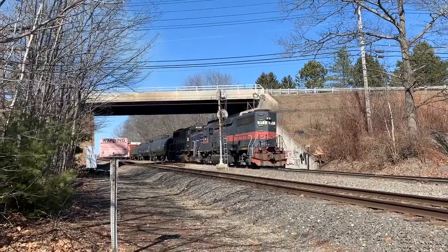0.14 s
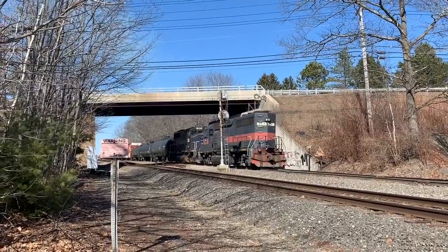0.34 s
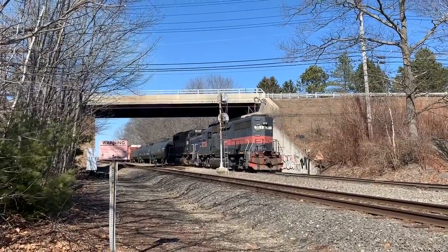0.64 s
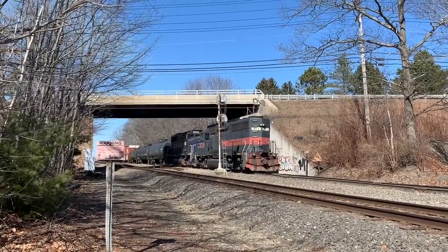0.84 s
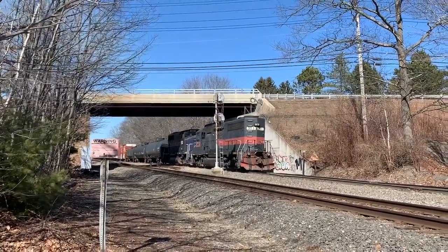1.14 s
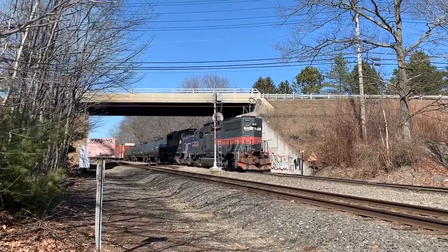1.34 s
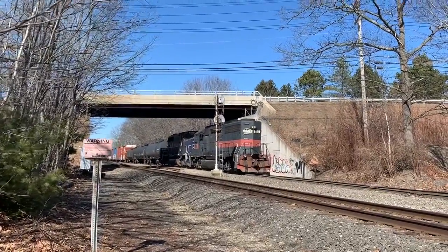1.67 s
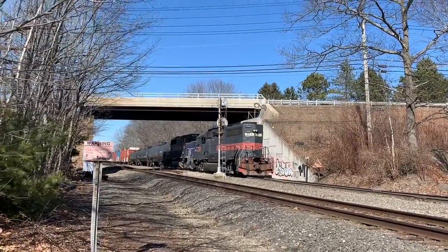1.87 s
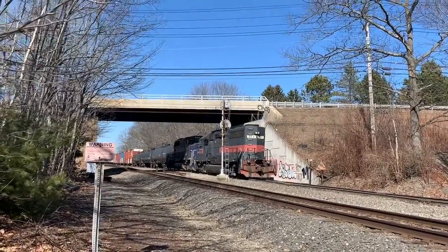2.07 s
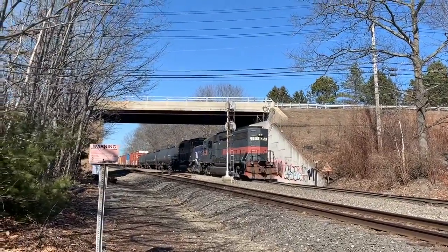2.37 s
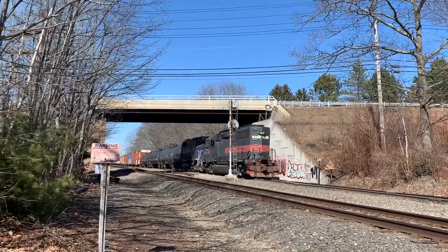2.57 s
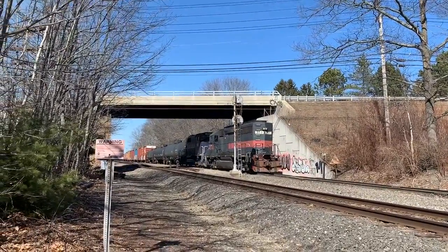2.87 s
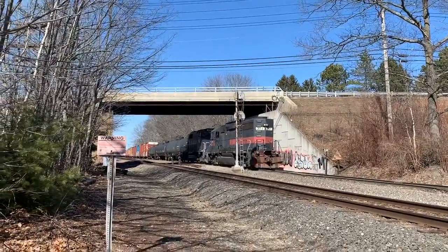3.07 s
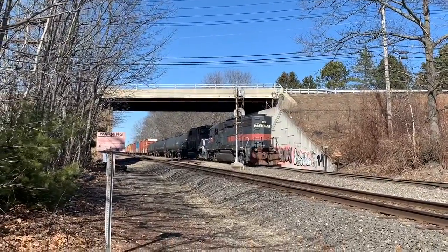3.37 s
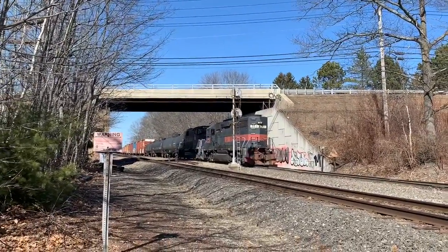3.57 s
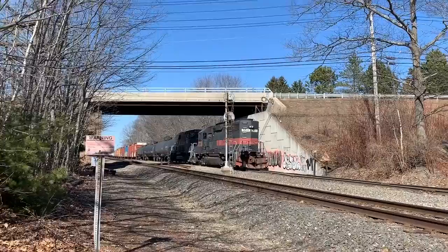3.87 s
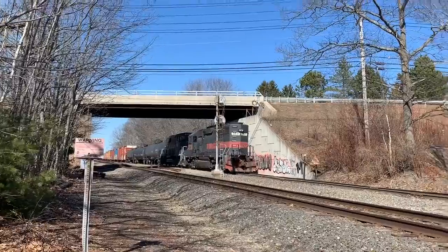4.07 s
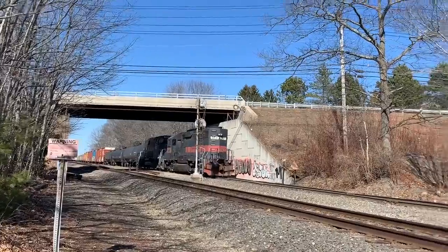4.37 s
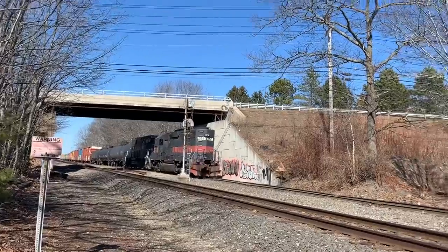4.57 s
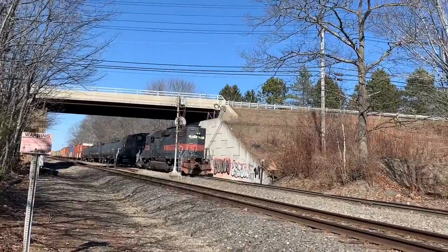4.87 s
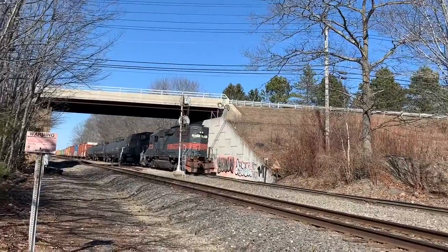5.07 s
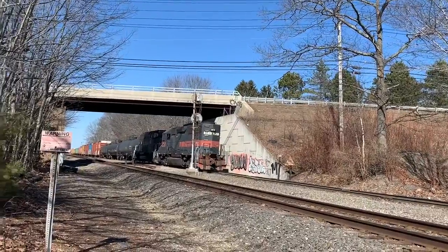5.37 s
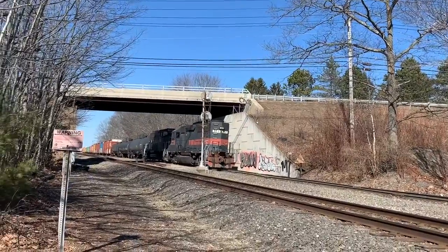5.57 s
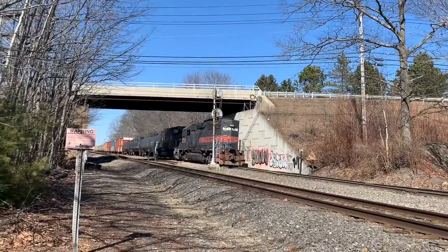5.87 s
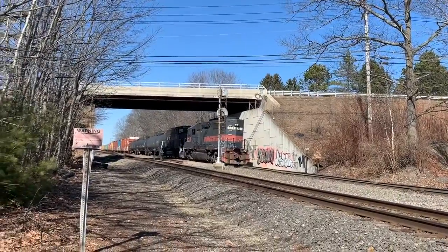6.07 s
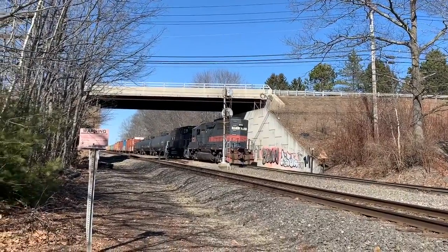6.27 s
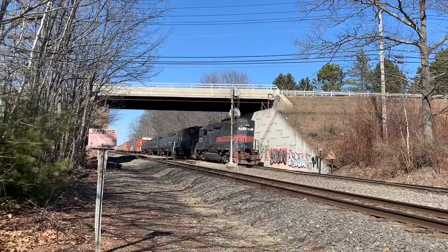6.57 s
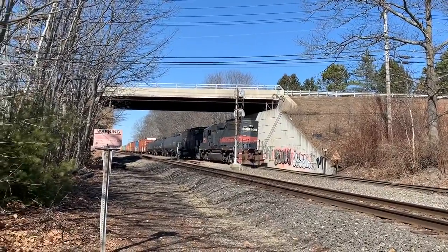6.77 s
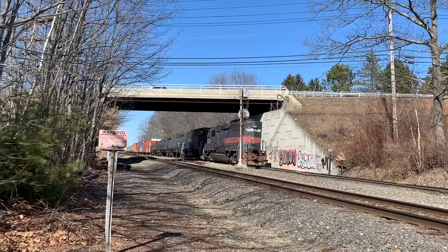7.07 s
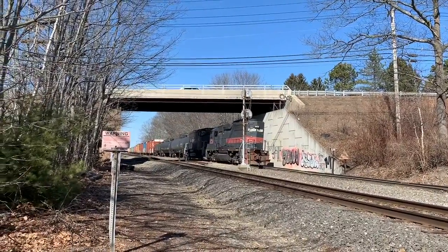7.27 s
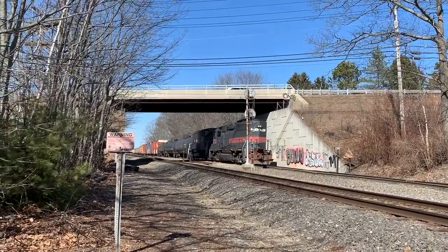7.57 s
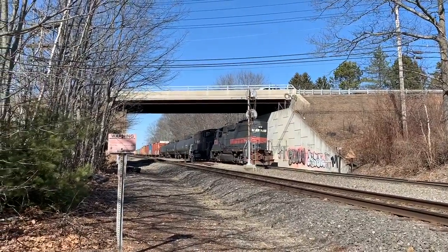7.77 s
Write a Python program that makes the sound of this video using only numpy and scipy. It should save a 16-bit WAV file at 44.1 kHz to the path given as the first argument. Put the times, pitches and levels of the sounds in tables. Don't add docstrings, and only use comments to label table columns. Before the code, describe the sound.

From 0 s two diesel locomotives fill the open air with a deep, beating throb, broad exhaust roar, gear whine and a high, breathy turbo whistle. All pitches slide steadily downward, the first engine settling by about 4 s and the second by 4.7 s, leaving a quieter, lumpy steady idle with fan rush to the end at nearly 8 s. A light knock comes at 1 s, a soft air sigh around 1.5 s, and a sharp air spit at 2.6 s. Hollow car bodies drum and flanges sing faintly, mostly early. The roar dips slightly near 4.1 s; a heavy coupler clunk cluster hits at 4.85 s. Short air spits follow at 5.0, 5.5 (brightest), 5.9 and 7.5 s, with a small knock at 6.9 s. Low wind buffets the handheld stereo microphone, strongest around 5, 6.5 and 7.3 s.

```python
import sys
import numpy as np
from scipy import signal
from scipy.fft import rfft, irfft, next_fast_len
from scipy.io import wavfile
from scipy.ndimage import map_coordinates

SR = 44100
rng = np.random.default_rng(int(sys.argv[2]) if len(sys.argv) > 2 else 0)


def file_out(sig):
    cols = np.atleast_2d(sig).T
    lim = np.clip(cols, -1, 1)
    pcm = np.round(lim * 32767).astype(np.int16)
    wavfile.write(sys.argv[1], SR, pcm)


def nominal_scale(level):
    x = np.asarray(level, float) / 20
    return 10 ** x


N = 349713


def locomotives():
    # time_s, first_rev_per_s, second_rev_per_s
    crank_speeds = [(0.0, 8.141, 8.816), (0.5, 7.704, 8.478), (1.0, 7.283, 8.055), (1.5, 6.849, 7.69),
                    (2.0, 6.437, 7.226), (2.25, 6.231, 7.157), (2.75, 5.839, 6.825), (3.25, 5.473, 6.375),
                    (3.5, 5.32, 6.223), (3.75, 5.223, 6.083), (4.0, 5.182, 5.909), (4.25, 5.172, 5.77),
                    (4.5, 5.173, 5.682), (4.75, 5.182, 5.655), (5.5, 5.213, 5.698), (6.1, 5.221, 5.704),
                    (7.0, 5.2, 5.701), (7.93, 5.195, 5.681)]
    # time_s, first_db, second_db
    whine_levels = [(0.0, -43, -48.5), (0.75, -48.5, -53.5), (1.5, -48.5, -57), (2.5, -50.5, -57),
                    (2.8, -51.5, -59), (3.15, -54, -60.5), (3.5, -50, -54.5), (3.75, -56, -58),
                    (4.05, -49, -55), (4.3, -51, -58), (4.55, -51, -55.5), (5.0, -53.5, -52.5),
                    (5.5, -52, -58.5), (5.9, -59, -57.5), (6.1, -51.5, -53), (6.5, -57.5, -55),
                    (6.9, -54.5, -58), (7.25, -50.5, -53), (7.93, -57.5, -56)]
    rev_1, rev_2 = curves(crank_speeds)
    whine_1, whine_2 = curves(whine_levels)
    firing_1, firing_2 = firing(rev_1, rev_2)
    first, crank_1 = engine(rev_1, .03, firing_1, whine_1, trim_db=-4)
    second, crank_2 = engine(rev_2, -.45, firing_2, whine_2, trim_db=0)
    return first + second + roar(rev_1, rev_2, crank_1, crank_2)


def firing(rev_1, rev_2):
    # time_s, level_db
    throb = [(0, -12.5), (.66, -14.5), (1.32, -19), (1.98, -24.5), (2.31, -20.5), (2.64, -22), (3.3, -26),
             (4.45, -40), (4.95, -28.5), (7.93, -29.5)]
    # idle_db, loaded_db
    first_throb = (-32, -26.5)
    # centre_hz, half_width_hz, gain_db
    path_bands = [(49, 3, -8), (91.5, 3.5, 17)]

    def lope_db(rev):
        loaded_db, idle_db, settles = -48.5, -28.5, 0.16
        excess = np.maximum(rev / rev[-1] - 1, 0)
        return between(loaded_db, idle_db, np.exp(-(excess / settles) ** 1.23))

    def path_db(hz):
        return sum(db * np.exp(-((hz - centre) / width) ** 2) for centre, width, db in path_bands)

    depth_db, period_s, first_crest_s = 2.5, 2.2, 4.5
    hunt_db = depth_db * np.cos(2 * np.pi * (np.arange(N) / SR - first_crest_s) / period_s)
    floor_db, lift_db, cutoff_hz = -40.5, 19.5, 65.8
    ninth_db = floor_db + lift_db / (1 + (cutoff_hz / (9 * rev_2)) ** 40)
    eighth_db = between(*first_throb, loading(rev_1)) + path_db(8 * rev_1)
    first = [eighth_db, lope_db(rev_1) + path_db(15 * rev_1)]
    second = [curves(throb)[0], ninth_db, lope_db(rev_2) + hunt_db]
    return zip((8, 15), first), zip((8, 9, 15), second)


def engine(rev, start, strong_orders, whine_db, trim_db):
    crank = np.cumsum(rev) / SR + start
    load = loading(rev)
    sound = exhaust_lines(crank, rev, load, strong_orders, trim_db)
    sound += gear_lines(crank, rev, load, trim_db)
    sound += turbo(crank, rev, load, whine_db)
    return sound, crank


def exhaust_lines(crank, rev, load, strong_orders, trim_db):
    # order, loaded_db, idle_db
    uneven = [(6, -48.0, -52.0), (7, -36.0, -44.0), (10, -43.0, -40.0), (11, -43.0, -41.0),
              (12, -43.0, -41.0), (13, -42.0, -46.0), (14, -46.0, -36.0), (16, -39.0, -39.0),
              (17, -46.0, -39.0), (18, -42.0, -48.0), (19, -43.0, -45.0), (20, -49.0, -51.0),
              (21, -47.0, -48.0), (22, -46.0, -53.0), (23, -42.0, -50.0), (24, -42.0, -42.0),
              (25, -48.0, -54.0), (26, -50.0, -52.0), (33, -44.0, -44.0), (36, -46.0, -47.0)]
    out = sum(tone(k * crank, db, blur_hz=2, steady=.99) for k, db in strong_orders)
    for k, loaded, idle in uneven:
        stack_db = 7 * resonance(k * rev, 84, 9) - 3
        db = between(idle, loaded, load) + stack_db + trim_db
        out += tone(k * crank, db, blur_hz=2.05, steady=0.32)
    return out


def gear_lines(crank, rev, load, trim_db):
    # order, loaded_db, idle_db
    gears = [(206, -73, -60), (247, -77.5, -61.5)]
    # order, loaded_db, idle_db
    main_gears = [(78.56, -48, -54.5), (144, -49.5, -49), (157.7, -53.5, -53), (291, -60.5, -57.5),
                  (430, -59.5, -59.5)]
    # centre_hz, half_width_hz, gain_db
    casing = [(467, 5.3, 6.5), (540, 13, 13.5), (592, 4.9, 5.5), (666, 17, 7), (900, 24, 4), (956, 31, 10),
              (1130, 52, 1.5), (1628, 12, 4.5), (2010, 130, 8), (2960, 440, -0.5)]
    # loaded_db, idle_db
    blower_loaded, blower_idle = (-53, -53)
    out = np.zeros(N)
    for k, loaded, idle in gears:
        out += tone(k * crank, between(idle, loaded, load) + 2 * trim_db, blur_hz=9, steady=1.0)
    for k, loaded, idle in main_gears:
        casing_db = sum(db * resonance(k * rev, centre, width) for centre, width, db in casing)
        db = between(idle, loaded, load) + casing_db + 2 * trim_db
        out += tone(k * crank, db, blur_hz=24, steady=.6)
    blower_db = between(blower_idle, blower_loaded, load) + (2 + 2 * load) * trim_db
    out += tone(289 * crank, blower_db, blur_hz=120, steady=0)
    out += tone(272 * crank, -49 - 14 * np.sqrt(load) + trim_db, blur_hz=260, steady=0)
    return out


def turbo(crank, rev, load, whine_db):
    # frequency_hz, density_db
    hiss_spectrum = [(5000, -20), (6500, 0), (7700, -6), (8600, -2), (10200, -7), (11200, -15.5),
                     (12200, -15), (13300, -17), (14000, -30), (15000, -36), (15200, -60)]
    passes = 849
    blades = passes * crank + np.cumsum(12 * wobble(30)) / SR
    torn = load ** 1.6
    out = tone(blades, whine_db + 1.5 - 3 * torn, blur_hz=100, steady=.76)
    out += tone(blades, whine_db - 12 + 13 * torn, blur_hz=260, steady=0)
    top_loss_db = 17 / (1 + (14100 / (2 * passes * rev)) ** 30)
    out += tone(2 * blades, whine_db - 15 - top_loss_db, blur_hz=337, steady=.15)
    out += tone(passes * crank, whine_db - 9.0, blur_hz=600, steady=0)
    hiss_db = -68.5 + 9 * (rev / rev[-1] - 1) / 0.41 + 2.3 * wobble(5.2)
    return out + nominal_scale(hiss_db) * noise(hiss_spectrum)


def roar(rev_1, rev_2, crank_1, crank_2):
    # idle_db, rise_under_load_db
    levels = [(-33, 4.5), (-43.5, 2.5), (-46.5, 6.5), (-55, 6.5)]
    # frequency_hz, density_db
    exhaust_spectrum = [(25, -36), (50, 6), (100, -4), (160, -1), (250, -4), (350, -8), (470, -14.5),
                        (560, -12), (660, -12), (760, -26), (1000, -45.5)]
    # frequency_hz, density_db
    hood_spectrum = [(600, -30), (780, -3), (900, 0), (985, -2), (1060, -20), (1300, -45)]
    # frequency_hz, density_db
    fan_spectrum = [(800, -30), (1040, -2), (1300, -1), (1550, -2.5), (1680, -3.5), (1800, -7.5),
                    (2350, -6), (2650, -13), (4000, -40)]
    # frequency_hz, density_db
    intake_spectrum = [(2000, -22), (2750, 0), (3230, 1.5), (3400, -6), (4800, -7), (5300, -10.5),
                       (6500, -17), (8000, -40)]
    # speed_rev_per_s, half_width_rev_per_s, gain_db
    speed, width, boom_db = (7.78, 0.49, 1.65)
    # time_s, half_length_s, gain_db
    at_s, half_s, depth_db = (4.08, 0.47, -1.83)
    load = (loading(rev_1) + loading(rev_2)) / 2
    chug = np.cos(2 * np.pi * 2 * crank_2) + np.cos(2 * np.pi * 16 * crank_1)
    shadow_db = depth_db * np.exp(-((np.arange(N) / SR - at_s) / half_s) ** 2)
    booms = (0, boom_db * np.exp(-((rev_2 - speed) / width) ** 2), 0, 0)
    spectra = (exhaust_spectrum, hood_spectrum, fan_spectrum, intake_spectrum)
    lifts_db = (1.66, 2.02, 2.07, 3.2)
    out = np.zeros(N)
    for (idle, rise), boom, spectrum, lift in zip(levels, booms, spectra, lifts_db):
        db = idle + rise * load + shadow_db + boom + lift + 0.24 * chug + 1.1 * wobble(7)
        out += nominal_scale(db) * noise(spectrum)
    return out


def loading(rev):
    return np.clip((rev / rev[-1] - 1) / 0.43, 0, 1)


def train():
    # start_s, level_db, pitch_hz
    knocks = [(1.038, -9.5, 293), (4.817, -16, 500), (4.839, -11.5, 514), (4.8407, -9, 260),
              (4.843, -14.5, 900), (4.846, -10, 426), (4.8523, -7.5, 216), (4.859, -5.5, 159),
              (4.867, -22, 600), (4.891, -16, 258), (6.908, -17, 493)]
    # centre_s, length_s, pitch_hz, level_db
    swelling_tones = [(0.93, .1, 1300, -45), (2.6, .15, 2400, -55.5), (3.55, 0.27, 2750, -53),
                      (3.3, 0.31, 156, -32), (4.515, .06, 88, -18), (4.68, .08, 85, -21), (7.31, .04, 80, -19),
                      (7.84, .14, 92, -23), (5.95, 2.2, 205.5, -40), (3.85, .7, 470, -47), (.6, 1.4, 2380, -55),
                      (2.45, .4, 4080, -66), (7.09, .04, 6850, -62), (3.1, .04, 2400, -59), (7.31, .05, 6450, -67),
                      (5.1, 3.7, 6400, -80)]
    # centre_s, length_s, pitch_hz, level_db
    drums = [(0.64, 0.32, 260, -32), (1.49, 0.8, 270, -35.5), (2.5, 0.29, 163, -31.5),
             (4.8, 0.31, 160, -33), (1.4, 0.52, 390, -39), (0.39, 0.31, 650, -40), (1.53, 0.47, 170, -37),
             (1.37, 0.21, 410, -42), (3.61, 0.23, 290, -40), (2.1, .25, 300, -38)]
    t = np.arange(N) / SR
    out = np.zeros(N)
    for s, db, hz in knocks:
        age = np.maximum(t - s, 0)
        onset = 1 - np.exp(-(age / 0.0003) ** 2)
        out += nominal_scale(db - 60 * age * hz / 3.4) * np.sin(2 * np.pi * hz * age) * onset
    for s, length, hz, db in swelling_tones:
        swell = np.exp(-((t - s) / (.5 * length)) ** 2)
        out += swell * tone(hz * t, db, blur_hz=hz / 150, steady=.75)
    for s, length, hz, db in drums:
        swell = np.exp(-((t - s) / (.5 * length)) ** 2)
        out += swell * tone(hz * t, db, blur_hz=hz / 3, steady=0)
    return out


def air():
    # start_s, level_db, open_s, tail_db, lowest_hz
    valve_spits = [
        (1.45, -49.5, 0.033, 0, 8000),
        (2.621, -27, 0.0078, -5, 1000),
        (2.72, -50, .03, -6, 5000),
        (5.023, -46.5, 0.0093, 4.5, 2400),
        (5.5266, -20.5, 0.0044, -17.5, 7050),
        (5.9265, -38, 0.0076, -10, 4200),
        (7.526, -31, 0.0086, -0.5, 1300),
    ]
    # frequency_hz, density_db
    jet_spectrum = [(900, -7), (1900, 5), (3200, 5), (4100, 4.5), (5300, -5), (7200, 2), (11000, -2),
                    (14000, -4), (16000, -9), (16600, -30)]
    # time_s, level_db
    sigh = [(1.35, -60), (1.48, -37), (1.54, -29.5), (1.62, -37), (1.8, -60)]
    t = np.arange(N) / SR
    jet = nominal_scale(1.6 * wobble(150)) * noise(jet_spectrum)
    spits = np.zeros(N)
    for s, db, open_s, tail_db, low_hz in valve_spits:
        age = np.maximum(t - s, 0)
        opening = nominal_scale(db) * (1 - np.exp(-age / .0016))
        tail = nominal_scale(tail_db - 1 - 60 * age / .18) + nominal_scale(tail_db - 13 - 60 * age / .3)
        above = lambda hz: 1 - .86 / (1 + (hz / low_hz) ** 2.5)
        spits += opening / (1 + (age / open_s) ** 7) * filtered(jet, above)
        spits += opening * tail * filtered(jet, lambda hz: above(hz) / (1 + (hz / 15300) ** 60))
    leak = filtered(noise(jet_spectrum), lambda hz: 1 / (1 + (hz / 3600) ** 4))
    return spits + nominal_scale(curves(sigh)[0]) * leak


def ports(x):
    # frequency_hz, phase_rad
    lead = [(60, .08), (340, .45), (690, 1.1), (860, .3), (1030, 1.1), (1380, 4.4), (1750, 4.5),
            (2200, 6.3), (2700, 8.8), (2830, 7.9), (3200, 9.4), (3500, 10.8), (4050, 12.6), (4380, 13.2),
            (4750, 16.3), (5200, 16.4), (5480, 15.5), (5750, 13.3), (6500, 12.3), (7400, 10.9),
            (8300, 9.45), (9100, 9.1), (10200, 7), (11100, 6.3), (13400, 3.14), (14200, 2.6), (15300, 0)]
    # frequency_hz, level_db
    left = [(60, 1.4), (200, -.4), (430, 0), (760, 9), (1000, 2), (1250, 5.5), (1700, 3), (2100, .5),
            (2500, -2), (3500, -.5), (4000, -2), (4700, -6.5), (5500, -4.5), (6300, 0), (8000, .6),
            (15000, 0)]
    # frequency_hz, shared_fraction
    alike = [(60, .995), (300, .96), (700, .65), (950, .85), (1250, .4), (1600, .3), (2350, .72),
             (2750, .3), (3150, .78), (3600, .3), (4300, .5), (4800, .8), (5600, .2), (6500, .78),
             (7300, .5), (8000, .99)]
    turn = lambda hz: np.arccos(np.clip(along(alike, hz), 0, 1)) / 2
    common = filtered(x, lambda hz: np.cos(turn(hz)))
    apart = filtered(scatter(x), lambda hz: np.sin(turn(hz)))
    shade = lambda hz: nominal_scale(along(left, hz) / 2) * np.exp(.5j * along(lead, hz))
    pair = np.array([common + apart, common - apart])
    return filtered(pair, lambda hz: np.array([shade(hz), 1 / shade(hz)]))


def scatter(x):
    hop = round(.17 * SR)
    out = np.zeros(N + 3 * SR)
    padded = np.pad(x, (hop, 2 * hop))
    window = np.sin(np.pi * np.arange(2 * hop) / (2 * hop))
    for start in range(0, N + hop, hop):
        tail = rng.standard_normal(SR // 4) * nominal_scale(-60 * np.arange(SR // 4) / SR / 0.12)
        piece = signal.fftconvolve(padded[start:start + 2 * hop] * window, tail / np.linalg.norm(tail))
        out[start:start + len(piece)] += piece
    return out[hop:hop + N]


def wind():
    # time_s, level_db
    gusts = [(0.0, -49), (0.3, -37), (1.05, -34.5), (2.1, -29.5), (3.15, -30), (4.3, -29), (4.5, -31),
             (4.7, -25.5), (5.05, -22.5), (5.4, -34), (5.7, -26), (6.0, -42), (6.5, -25), (6.8, -31.5),
             (7.3, -19.5), (7.55, -28), (7.85, -22)]
    # frequency_hz, density_db
    buffet = [(8, -30.5), (22, -9.5), (40, -11.5), (60, 2), (85, 1.5), (120, -8.5), (170, -17.5),
              (250, -28.5), (500, -30.5), (1000, -58.5)]
    lumps = [unit(nominal_scale(2.8 * wobble(11)) * noise(buffet)) for port in range(3)]
    return nominal_scale(curves(gusts)[0] - 1.5) * (np.array(lumps[:2]) + .7 * lumps[2])


def capsule_hiss():
    # frequency_hz, density_db
    self_noise = [(12500, -16), (14200, -10), (14600, 0), (15100, -1), (15250, -40)]
    early_db = -7 / (1 + (np.arange(N) / SR / 1.9) ** 12)
    return nominal_scale(-81 + early_db) * np.array([noise(self_noise), noise(self_noise)])


def tone(turns, db, blur_hz, steady):
    steady = np.clip(steady, 0, 1)
    scattered = np.sqrt((1 - steady ** 2) * .5) * (wobble(blur_hz) + 1j * wobble(blur_hz))
    return np.sqrt(2) * nominal_scale(db) * np.real((steady + scattered) * np.exp(2j * np.pi * turns))


def noise(spectrum):
    response = lambda hz: nominal_scale(along(spectrum, hz)) * (hz < spectrum[-1][0])
    return unit(filtered(rng.standard_normal(N), response))


def filtered(x, response):
    m = next_fast_len(N + SR)
    return irfft(rfft(x, m) * response(np.fft.rfftfreq(m, 1 / SR)), m)[..., :N]


def resonance(hz, centre, width):
    return 1 / (1 + ((hz - centre) / width) ** 2)


def wobble(rate):
    return map_coordinates(rng.standard_normal(int(N * rate / SR) + 4), [np.arange(N) * rate / SR])


def between(idle, loaded, load):
    return idle + load * (loaded - idle)


def curves(rows):
    s, *cols = np.transpose(rows)
    return [np.interp(np.arange(N) / SR, s, c) for c in cols]


def along(points, hz):
    f, v = np.transpose(points)
    return np.interp(np.log(hz + 1), np.log(f + 1), v)


def unit(x):
    return x / np.sqrt(np.mean(x ** 2) + 1e-20)


def scene():
    return ports(locomotives() + train() + air()) + wind() + capsule_hiss()


def top_cut(x):
    return signal.sosfilt(signal.butter(12, 16660, fs=SR, output="sos"), x)


def record(dry):
    held = dry / (1 + np.abs(dry / .62) ** 8) ** (1 / 8)
    banded = filtered(held, lambda hz: 1 / (1 + (hz / 16300) ** 40))
    return top_cut(banded)


dry = scene()
out = record(dry)
file_out(out)
```